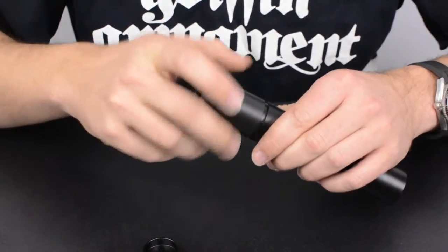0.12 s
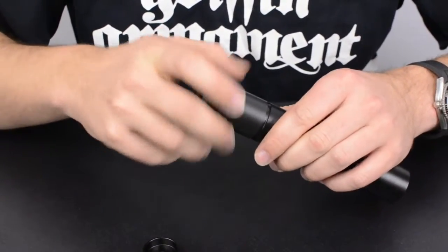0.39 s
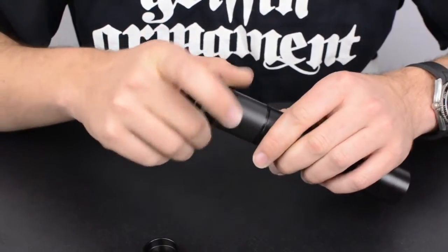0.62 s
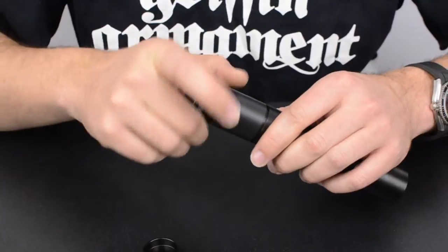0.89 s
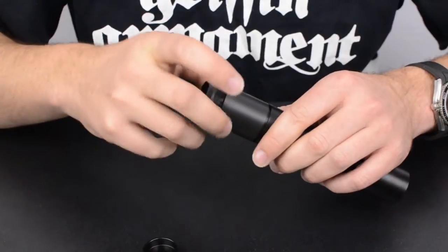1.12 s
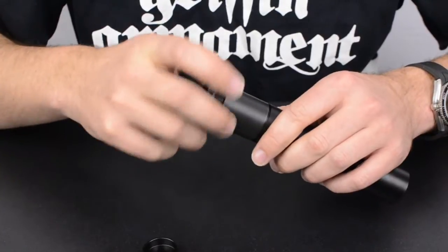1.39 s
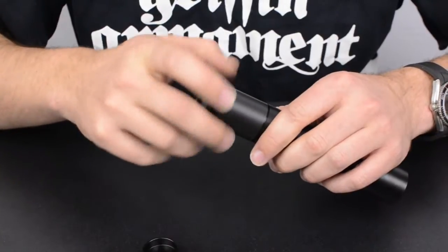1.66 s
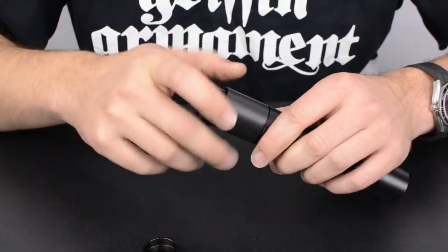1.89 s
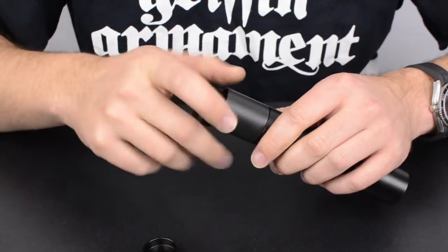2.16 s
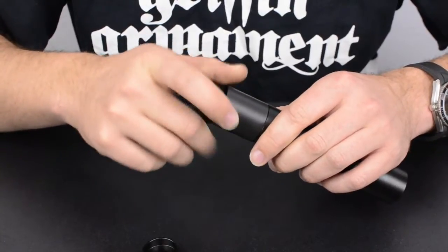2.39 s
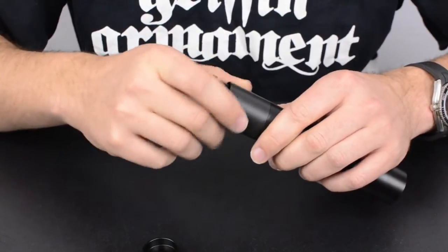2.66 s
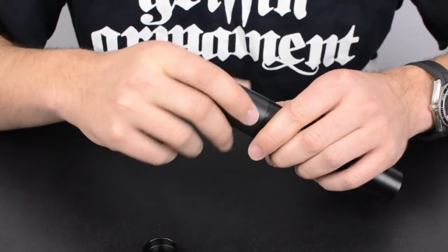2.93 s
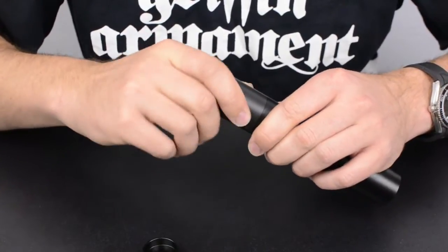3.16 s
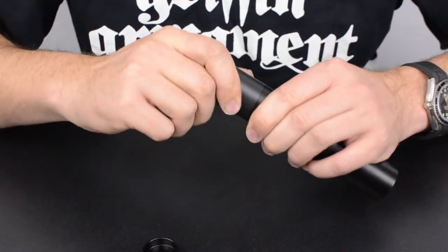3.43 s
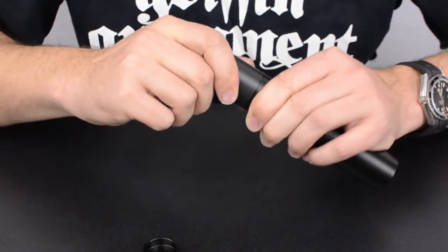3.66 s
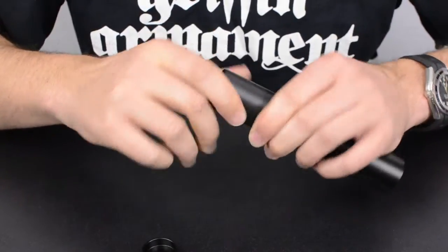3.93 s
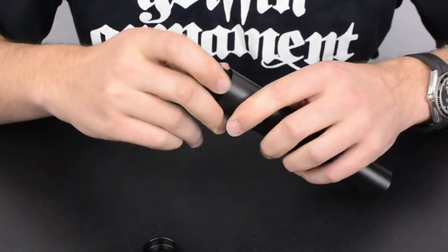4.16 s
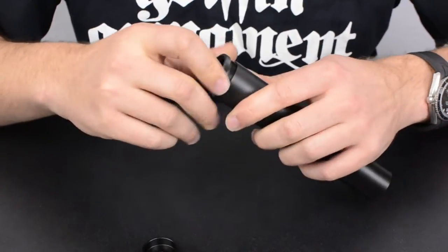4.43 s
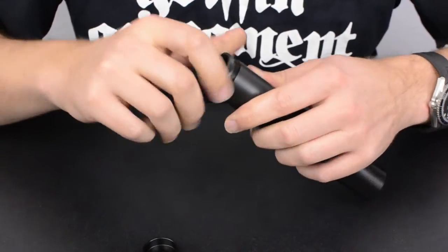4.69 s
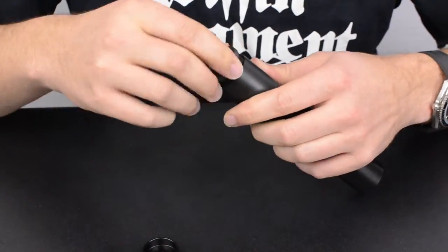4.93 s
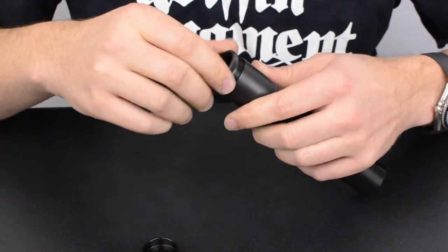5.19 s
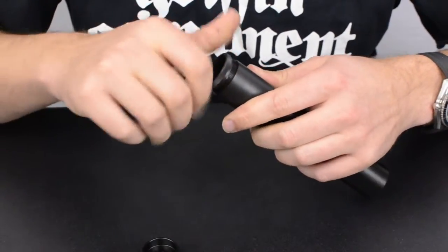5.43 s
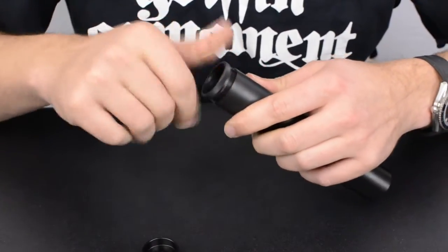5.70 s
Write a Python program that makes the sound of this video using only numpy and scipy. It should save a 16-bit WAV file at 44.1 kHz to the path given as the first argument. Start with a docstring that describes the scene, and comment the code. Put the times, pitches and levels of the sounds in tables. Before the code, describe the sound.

Gritty metal thread rubs and bright little knocks come in quick regular bursts, lightly hollow from the tube and palm. They thin out, then a cap is set down on a board with a dull, short-ringing knock. Near silence follows before isolated clicks and scrapes of a second threaded piece. Dry, close pickup indoors, very short room tail, faint background noise.

```python
"""Threads grind and click as hands unscrew a metal cap from a tube in short strokes, close to one microphone.
Tiny slips and sharp knocks ring the gripped metal, the tube air and the palm. The cap is set down with a
dull knock on a wooden board, then a second threaded part is worked, its thread catches and it is turned on.
Behind lie a small furnished room's short tail, noise of room and preamplifier, a distant machine's hum
and the low rustle of arms, wrists and fingers."""
import sys
import numpy as np
from scipy import signal
from scipy.fft import rfft, irfft
from scipy.io import wavfile
from scipy.ndimage import uniform_filter1d

SR = 44100
rng = np.random.default_rng(int(sys.argv[2]) if len(sys.argv) > 2 else 0)


def master(y):
    """Save y as 16-bit WAV."""
    cut = np.clip(np.atleast_2d(y).T, -1, 1)
    pcm = np.round(cut * 32767)  # scale
    wavfile.write(sys.argv[1], SR, pcm.astype(np.int16))


def rack_gain(trim_db):
    """Turn a fader trim in dB into the linear factor to multiply a signal by."""
    fader = np.asarray(trim_db, float)
    return 10 ** (fader / 20)


N = 256701  # samples in the scene


def evened(x):
    """Scales to rms 1."""
    return x / np.sqrt(np.mean(x ** 2) + 1e-20)


def coloured(x, points):
    """Gives x a spectral shape from (pitch_hz, level_db) points, with causal (minimum) phase."""
    f, db = np.transpose(points)
    hz = abs(np.fft.fftfreq(4096, 1 / SR))
    shape_db = np.interp(np.log(hz + 1), np.log(f + 1), db)
    log_gain = np.log(rack_gain(np.maximum(shape_db, -100)))
    taps = np.fft.ifft(np.exp(np.conj(signal.hilbert(log_gain)))).real[:2048]
    return signal.oaconvolve(x, taps / np.linalg.norm(taps))[:len(x)]


def ring(x, hz, t60):
    """One mode: a unit click starts a dying sine of height 1."""
    r = 1000 ** (-1 / (t60 * SR))
    w = 2 * np.pi * hz / SR
    return signal.lfilter([0, np.sin(w)], [1, -2 * r * np.cos(w), r * r], x)


def swell_ring(x, hz, t60):
    """A mode that takes about a millisecond to build up, so it spills no click into other bands."""
    rise_t60 = .005
    return ring(ring(x, hz, rise_t60), hz, t60) * 2 * np.log(1000) / (rise_t60 * SR)


def wander(seconds):
    """Slow chance of rms 1: noise smoothed twice over the given time."""
    size = max(round(seconds * SR), 1)
    return evened(uniform_filter1d(uniform_filter1d(rng.standard_normal(N), size), size))


def train(seconds, heights):
    """Clicks of given heights at given times."""
    x = np.zeros(N)
    np.add.at(x, np.minimum((np.asarray(seconds) * SR).astype(int), N - 1), heights)
    return x


def chatter(x, t60, share):
    """Each contact bounces for a moment: the click plus a dying burst of noise."""
    fall = signal.lfilter([1], [1, -1000 ** (-1 / (t60 * SR))], abs(x))
    return x + share * fall * rng.standard_normal(N)


def grit(per_s, spread_db):
    """Dense tiny slips of uneven size, rms 1."""
    size = rack_gain(spread_db * np.minimum(rng.exponential(1, N), 3.2))
    slips = rng.random(N) < per_s / SR
    return evened(size * slips * rng.choice([-1., 1.], N))


# rubs of thread on thread, levels before the mix:
# start_s, length_s, level_db, hiss_db (fine hiss at top speed, over the grind), pitch_hz (favoured mode)
RUBS = [(0, 0.044, -29, -26, 2158), (0.03, 0.047, -46.5, -11, 2870), (0.197, .075, -24.5, -19.5, 4334),
        (0.27, 0.044, -26, -23.5, 3020), (0.449, 0.044, -38.5, -36, 2940), (0.493, 0.099, -30, -15, 4400),
        (0.589, 0.041, -28.5, -36, 2875), (0.76, 0.011, -27, -33.5, 2850), (0.781, 0.11, -28.5, -18, 3960),
        (0.888, 0.023, -30, -31, 3309), (1.08, 0.1, -42.5, -36.5, 2840), (1.135, 0.084, -29, -20.5, 3920),
        (1.221, 0.064, -34.5, -41.5, 2920), (1.407, 0.11, -44, -35.5, 2390),
        (1.451, 0.093, -30.5, -16.5, 4090), (1.528, 0.038, -44, -22, 3090),
        (1.735, 0.1, -31.5, -17.5, 2930), (1.82, 0.038, -33, -38, 2940), (1.893, 0.036, -51, -38, 2480),
        (1.994, 0.11, -31.5, -17.5, 4080), (2.071, 0.048, -31.5, -43.5, 2310),
        (2.241, 0.036, -32.5, -28, 3000), (2.269, 0.085, -34, -14, 3640), (2.332, 0.053, -32, -31, 2320),
        (2.384, 0.018, -51, -36, 2300), (2.554, 0.073, -31.5, -20.5, 4360), (2.66, 0.044, -39.5, -32, 2200),
        (2.743, .03, -53.5, -37, 3550), (2.769, 0.019, -39.5, -32, 4010),
        (2.906, 0.012, -56.5, -36.5, 3180), (2.938, .014, -55.5, -37, 4000),
        (3.786, 0.039, -46, -29.5, 3990), (3.866, 0.027, -52.5, -49, 1826),
        (3.932, 0.029, -53.5, -37.5, 2040), (3.98, 0.043, -45.5, -45, 1790),
        (4.012, 0.03, -26.5, -30, 4800), (4.165, 0.056, -45, -33, 5340), (4.232, 0.039, -28, -32, 3500),
        (4.364, 0.027, -44.5, -42, 1860), (4.375, 0.076, -42.5, -40.5, 2140),
        (4.464, 0.085, -48, -33.5, 2080), (4.535, 0.034, -55, -42, 2100), (4.846, 0.038, -39, -45.5, 4970),
        (4.977, .04, -21.5, -32, 5340), (5.09, 0.048, -48.5, -32, 2280), (5.182, 0.1, -35.5, -33, 4610),
        (5.264, 0.058, -41.5, -34.5, 2200), (5.298, 0.093, -33, -32, 4980), (5.539, 0.049, -27, -27, 4720),
        (5.572, 0.098, -28.5, -16.5, 5040), (5.666, 0.036, -34.5, -31, 5140),
        (5.809, 0.016, -30.5, -41, 3460)]
ATTACK_CAP_S, ATTACK_INSERT_S = 0.014, .015  # rubs of both parts take about 15 ms to rise
RELEASE_S = 0.0074  # letting go takes 20 dB in this time
TOP_CAP, TOP_INSERT = .45, 0.59  # share of the rub at which the fingers move fastest
ARCH_CAP_DB, ARCH_INSERT_DB, SLOW_HISS_DB = 6.5, 11, 13.5  # fall of grind and of hiss when the turn is slow
START_HZ, SETTLES_AT = 2280., .25  # a cap rub favours this low pitch until this share of the rub


def motion(t):
    """Each rub is one arch of finger speed, which sets its grind, its hiss and the place of contact."""
    level, hiss, place_hz = np.zeros(N), np.zeros(N), np.full(N, 4000.)
    for start, length, db, hiss_db, hz in RUBS:
        on = (t >= start) & (t < start + length + 3 * RELEASE_S)
        since = t[on] - start
        cap = start < CAP_OFF_S
        top, arch_db, attack = ((TOP_CAP, ARCH_CAP_DB, ATTACK_CAP_S) if cap
                                else (TOP_INSERT, ARCH_INSERT_DB, ATTACK_INSERT_S))
        u = np.minimum(since / length, 1)
        slow = np.where(u < top, 1 - u / top, (u - top) / (1 - top)) ** 2
        release_db = 20 * np.maximum(since - length, 0) / RELEASE_S
        rub = rack_gain(db - arch_db * slow - release_db) * np.minimum(since / attack, 1)
        louder = rub >= level[on]  # where rubs overlap, the louder one leads
        leads = np.flatnonzero(on)[louder]
        hiss[leads] = rack_gain(hiss_db - SLOW_HISS_DB * slow)[louder]
        place_hz[leads] = np.where(cap & (u < SETTLES_AT), START_HZ, hz)[louder]
        level[on] = np.maximum(level[on], rub)
    return level, hiss, place_hz


# modes of the cap held on the tube: pitch_hz, t60_s (knocked), knock_db, grind_db
CAP = [(2250, .022, -1, 0), (2880, .02, -1, -3), (3550, .015, -5, -4), (4060, .02, 0, 1),
       (5150, .026, -2, -2), (6150, .02, -8, -6), (7098, .14, -12, -18), (7708, .035, -7, -13),
       (8630, .02, -12, -12), (9672, .04, -4, -9), (11300, .02, -28, -26), (13400, .035, -28, -25)]
# modes of the inner part once the cap is off: pitch_hz, t60_s (knocked), knock_db, grind_db
INSERT = [(2180, .02, -8, 0), (2750, .015, -7, -6), (3295, .065, -10, -5), (3704, .065, -8, -6),
          (4470, .03, -3, -2), (5060, .018, 0, -2), (6250, .025, -5, -6), (7200, .07, -14, -16),
          (7890, .025, -6, -12), (8900, .02, -10, -10), (9680, .05, -8, -18), (13400, .03, -30, -28)]
HIGH_HZ = 6800  # modes from here up form the high ring
GRIP = .5  # a rubbing hand shortens t60 to this share
TURNS_DB = 4.5  # rms by which grinding modes wander in level


def ground_modes(t, slips, hiss, place_hz):
    """Slips excite gripped, damped modes, which take turns as the contact moves."""
    low, high = np.zeros(N), np.zeros(N)
    reach, favour_db = .1, 5.  # the place of contact favours nearby pitches
    for k, (hz, t60, _, db) in enumerate(CAP + INSERT):
        held = (t < CAP_OFF_S) == (k < len(CAP))
        near = np.exp(-(np.log(hz / place_hz) / reach) ** 2)
        mode_db = db + favour_db * near + TURNS_DB * wander(0.045)
        drive = held * slips * rack_gain(mode_db) / np.sqrt(GRIP * t60 * SR)
        if hz < HIGH_HZ:
            low += swell_ring(drive, hz, GRIP * t60)
        else:  # only fast rubbing, which also hisses, reaches the high modes
            high += swell_ring(drive * hiss ** 0.52, hz, GRIP * t60)
    return low, high


def squeak(slips, place_hz):
    """The rubbing patch itself sings in a band that glides with the contact."""
    tilt, drift_db, width_hz = .9, .25, 260.  # a contact that favours high modes sings less
    sung_hz = uniform_filter1d(place_hz, size=40) * rack_gain(drift_db * wander(0.0069))
    turn = np.exp(2j * np.pi * np.cumsum(sung_hz) / SR)
    r = np.exp(-np.pi * width_hz / SR)
    drive = slips * (START_HZ / place_hz) ** tilt
    # shift the gliding band down to 0 Hz, filter it there, and shift it back
    band = signal.lfilter([(1 - r) ** 2], [1, -2 * r, r * r], drive / turn)
    return (turn * band).real / np.sqrt(1 - r)


# tube air and palm: pitch_hz, t60_s (knocked), level_db
HOLLOW = [(620, .025, -6), (840, .03, 0), (1100, .018, -1), (1450, .018, 0), (1780, .015, -2)]
SLOW_BOOM = .15  # the less a rub hisses, the more it booms (power of the hiss)


def ground_hollow(slips, hiss):
    """Slips boom in the tube air and palm, whose modes take turns."""
    palm = slips * (0.088 / np.maximum(hiss, 1e-4)) ** SLOW_BOOM
    out = np.zeros(N)
    for hz, t60, db in HOLLOW:
        turns = rack_gain(TURNS_DB * wander(0.025))
        out += rack_gain(db) * swell_ring(palm * turns, hz, GRIP * t60) / np.sqrt(t60 * SR)
    return out


# spectral shape of the broad grind and of each knock's crack: pitch_hz, level_db (relative, per Hz)
RASP = [(250, -55), (450, -17.5), (800, 2), (2500, 3), (4500, 4.5), (6500, 0), (9000, -15), (12000, -47),
        (15300, -61.5), (15700, -90)]


def grind():
    """Slips along the thread drive metal modes, a squeak, broad rasp, fine hiss and hollow boom."""
    t = np.arange(N) / SR
    level, hiss, place_hz = motion(t)
    rough = np.where(t < CAP_OFF_S, grit(4500, 5.), grit(9000, 2.7))  # the insert has the finer thread
    slips = level * rough * rack_gain(3.5 * wander(0.003))
    # the insert rubs more smoothly, and the open tube is less boomy
    softer = slips * rack_gain(np.where(t < CAP_OFF_S, 0, -5.))
    low, high = ground_modes(t, slips, hiss, place_hz)
    broad = coloured(softer, RASP)
    fine = coloured(level * hiss * grit(16000, 1.8), [(5500, -7.0), (8500, 2.5), (10500, -10.5),
                                                      (14000, -16), (15200, -24), (15650, -60)])
    metal = rack_gain(-1.5) * low + rack_gain(10.5) * high
    rubbing = rack_gain(3.) * squeak(slips, place_hz) + rack_gain(-2.5) * broad + rack_gain(10.5) * fine
    return metal + rubbing + rack_gain(-4.0) * ground_hollow(softer, hiss)


# thread flanks knocking, levels before the mix:
# start_s, level_db (strength), pitch_hz (favoured mode), ring_db (high ring over strength)
CLICKS = [(0.012, -13, 2100, -26), (0.0969, -16, 4980, -36), (.1847, -18, 2870, -41),
          (0.1953, -9, 2850, -36), (0.2189, -10.5, 4350, -18.5), (0.2297, -14.5, 4020, -25),
          (0.2502, -18, 3020, 2), (0.2551, -5, 5060, -13.5), (0.2892, -17.5, 5130, -22),
          (0.3089, -8.5, 2790, -12), (0.4947, -16, 2290, -40), (.513, -16.5, 2250, -33),
          (.616, -24, 2250, -35), (0.634, -21, 2880, -14.5), (0.699, -34.5, 2270, -30.5),
          (0.7284, -21, 3810, -28), (0.7775, -10.5, 5320, -16.5), (0.7978, -18.5, 2240, -40),
          (0.8472, -12.5, 5650, -21), (.899, -13.5, 2880, -23), (0.9115, -9.5, 4300, -14),
          (0.967, -36.5, 4060, -33), (1.0851, -30.5, 2830, -34.5), (1.134, -17, 1940, -36),
          (1.184, -15.5, 4060, -15), (1.2582, -23.5, 2250, -30), (1.313, -38, 2300, -31),
          (1.3422, -23.5, 2260, -22), (1.4236, -28, 2260, -37), (1.4562, -8.5, 4070, -31),
          (1.4934, -20, 2240, -9), (1.52, -17.5, 4060, -38), (1.556, -23.5, 4300, -40),
          (1.5814, -18.5, 4300, -17), (1.782, -15, 2340, -37.5), (1.7886, -12.5, 3030, -19.5),
          (1.8483, -18, 2900, -14), (1.9542, -42.5, 2880, -44), (1.992, -26.5, 2710, -28),
          (2.0016, -20.5, 2880, -24), (2.0172, -10.5, 2340, -30), (2.095, -26, 2250, -36.5),
          (2.198, -37, 2250, -35.5), (2.217, -14, 5240, -14.5), (2.261, -23, 4140, -31),
          (2.2866, -8.5, 3550, -26), (2.3407, -14.5, 3400, -26), (2.349, -20.5, 2280, -50),
          (2.36, -31, 2260, -40), (2.4607, -18.5, 4710, -24), (2.5322, -35.5, 2360, -36),
          (2.7711, -16, 4300, -17), (3.654, -50.5, 4090, -28), (3.9139, -29, 4000, -36.5),
          (3.996, -35.5, 4110, -32), (4.0175, -9, 3300, -50), (4.0189, -45, 3700, -30),
          (4.029, -20, 4470, -12.5), (4.1217, -30.5, 2180, -36), (4.2075, -23, 4470, -45),
          (4.2525, -11, 4470, -40), (4.2561, -10.5, 3700, -31), (4.662, -41, 2220, -25),
          (4.8999, -37.5, 3320, -34), (4.9943, -12, 4950, -38), (5.0057, -9.5, 5100, -27),
          (5.0115, -10.5, 5370, -34.5), (5.5351, -26, 4960, -32), (5.5573, -9, 4900, -33),
          (5.6158, -8, 4950, -36), (5.6277, -7, 5060, -17.5), (5.633, -6, 3300, -28),
          (5.8148, -33.5, 3500, -37)]
SEATED_S, SEATED_T60_S = 4.35, .025  # once its thread has caught, a knocked insert rings no longer than this
LOOSE_DB = 4.  # the insert's favoured mode rings more freely before its thread has caught
THUD_DB, THUD_FOLLOWS = -38., 0.46  # palm thud of a 0 dB knock, and the share of strength it follows
OPEN_THUD_DB = 3  # more thud once the tube is open


def knocks():
    """The place of contact favours one mode; the high ring has its own strength, the thud follows weakly."""
    start, strength_db, near_hz, ring_db = np.transpose(CLICKS)
    luck_db = 3.5 * rng.standard_normal((len(start), len(CAP + INSERT)))
    bounce_t60, bounce = .012, .45
    reach, place_db = .05, 10.  # the favoured mode
    ring_under_db, body_under_db = 4., 22.  # gripped metal rings well under the crack
    cap_off = start > CAP_OFF_S
    seated = start >= SEATED_S
    favour_db = place_db + LOOSE_DB * cap_off * ~seated
    out = np.zeros(N)
    for k, (hz, t60, db, _) in enumerate(CAP + INSERT):
        held = (start < CAP_OFF_S) == (k < len(CAP))  # the cap first, then the insert
        near = np.exp(-(np.log(hz / near_hz) / reach) ** 2)
        part_db = ring_db - ring_under_db if hz > HIGH_HZ else favour_db * near - body_under_db
        height = held * rack_gain(strength_db + db + part_db + luck_db[:, k])
        for now, decay in ((~seated, t60), (seated, min(t60, SEATED_T60_S))):
            out += swell_ring(chatter(train(start, now * height), bounce_t60, bounce), hz, decay)
    crack = coloured(chatter(train(start, rack_gain(strength_db - 5.5)), 0.01, 1.0), RASP)
    thud_db = THUD_DB + THUD_FOLLOWS * strength_db + OPEN_THUD_DB * cap_off
    thud = chatter(train(start, rack_gain(thud_db)), bounce_t60, bounce)
    hollow = sum(rack_gain(db) * swell_ring(thud, hz, t60) for hz, t60, db in HOLLOW)
    return out + crack + hollow


# cap meets table: start_s, level_db (strength before the mix)
SET_DOWN = [(3.121, -15.5)]
CAP_OFF_S = SET_DOWN[-1][0]  # from here on the insert is worked
# clear modes of the board: pitch_hz, level_db, t60_s
TABLE = [(770, -26.5, 0.47), (800, -6, 0.33), (1190, 1, 0.25), (1335, -35, 0.49), (1456, 4.5, 0.21),
         (1663, 8, 0.18), (2150, 10.5, 0.031), (2659, -33, 0.14), (3220, -32, 0.36), (3230, -18.5, 0.111),
         (3660, -7, 0.12), (4370, -17, 0.19), (2300, -4, 0.13), (4610, -21.5, 0.23)]
# spectral shape of the board's dense modes: pitch_hz, level_db (relative, per Hz)
TABLE_WASH = [(59, -152), (100, -10), (657, 11.5), (741, 22), (1040, 13), (1250, 19), (1440, 17),
              (2400, 3.5), (3760, -7.5), (5200, -19.5), (6500, -29), (10000, -46), (13000, -99),
              (22000, -120)]


def table():
    """A dull knock on a wooden board: clear modes over a dying wash of dense ones."""
    start, strength_db = np.transpose(SET_DOWN)
    blow = train(start, rack_gain(strength_db))
    modes = np.zeros(N)
    for hz, db, t60 in TABLE:
        modes += rack_gain(db - 23.0) * ring(chatter(blow, 0.027, 0.18), hz, t60)
    return modes + rack_gain(-3.5) * coloured(chatter(blow, 0.2, 1.15), TABLE_WASH)


def room(x, t60, top_hz):
    """A small furnished room: a short noisy tail, duller than the direct sound."""
    t = np.arange(SR // 3) / SR
    tail = rng.standard_normal(len(t)) * rack_gain(-60 * t / t60) * (t > .004)
    tail = signal.lfilter(*signal.butter(1, top_hz, fs=SR), tail)
    return signal.oaconvolve(x, tail / np.linalg.norm(tail))[:N]


# arms, wrists and fingers shifting: start_s, length_s, level_db (rms before fading), pitch_hz (centre)
RUSTLE = [(0, 0.0664, -54.5, 147), (0.426, .12, -55.5, 305), (1.21, .16, -56.5, 139),
          (1.215, 0.11, -52.5, 284), (3.124, 0.18, -55, 252), (3.929, 0.16, -59.5, 292),
          (4.05, 0.12, -50.5, 563), (4.711, .06, -57.5, 186), (5.2, 0.18, -69, 199.5),
          (2.741, 0.065, -51.5, 912), (2.912, 0.016, -53, 1050), (2.944, 0.024, -61.5, 1030),
          (3.912, 0.017, -40, 974), (3.793, 0.04, -50, 1300), (4.37, 0.03, -43.5, 1030),
          (4.864, 0.024, -43, 1420), (5.365, 0.05, -63, 700)]


def rustle():
    """Soft low noise, narrowed by two equal resonances, for each shift of the body."""
    out = np.zeros(N)
    for start, length, db, hz in RUSTLE:
        part = out[round(start * SR):][:round(length * SR)]
        t60 = 4.6 / hz
        soft = evened(ring(ring(rng.standard_normal(SR), hz, t60), hz, t60))[-len(part):]
        u = np.linspace(0, 1, len(part))
        part += rack_gain(db) * soft * np.minimum(u / 0.11, 1) * (1 - u ** 2)  # quick to start, slow to fade
    return out


# distant machine: pitch_hz, spread_hz (twice the half-power width), level_db (rms)
HUM = [(58.94, 6.6, -68), (533, 2.2, -70)]


def hum():
    """Noise through narrow resonances wavers like a distant machine."""
    return sum(rack_gain(db) * evened(ring(rng.standard_normal(N), hz, 4.4 / spread)) for hz, spread, db in HUM)


# spectral shape of room and preamplifier noise: pitch_hz, level_db (relative, per Hz)
AIR = [(20, -11.5), (45, -4.5), (90, -9), (300, -6.5), (700, -5.5), (1500, -7), (3000, -17), (7000, -24),
       (13000, -31.5), (15000, -37.5)]


def air():
    """Steady noise of the quiet room and the preamplifier, at -60 dB rms."""
    return rack_gain(-60) * evened(coloured(rng.standard_normal(N), AIR))


def scene():
    """All sources reach one capsule; the two channels differ only very faintly."""
    radiate = signal.butter(3, [560, 15300], "bandpass", fs=SR, output="sos")  # small parts radiate no bass
    hands = signal.sosfilt(radiate, grind() + knocks()) + table()
    mid = hands + rack_gain(-20.5) * room(hands, 0.26, 4100) + rustle() + hum() + air()
    smear = rng.standard_normal(256)
    side = rack_gain(-41.5) * signal.oaconvolve(mid, smear / np.linalg.norm(smear), "same")
    side_noise = coloured(rng.standard_normal(N), [(60, -11.5), (180, -5.5), (400, -2.5),
                                                   (3000, -5.5), (14000, -17.5)])
    side += rack_gain(-72.0) * evened(side_noise)
    return np.array([mid + side, mid - side])


# cancellations in the microphone housing: pitch_hz, width_hz, depth (0-1)
DIPS = [(5750, 400, .95), (6880, 150, .8)]


def microphone(x):
    """Sound cancels in the housing, which leaves narrow dips in the spectrum."""
    hz = np.fft.rfftfreq(N, 1 / SR)
    gain = np.ones(len(hz), complex)
    for f, width, depth in DIPS:
        gain *= 1 - depth / (1 + 2j * (hz - f) / width)
    return irfft(rfft(x) * gain, N)


def band_limit(x, edge_hz):
    """Removes every frequency from the edge up."""
    return irfft(rfft(x) * (np.fft.rfftfreq(N, 1 / SR) < edge_hz), N)


def top_cut(x):
    """Nothing passes above the cut-off."""
    return signal.sosfilt(signal.butter(12, 15750, fs=SR, output="sos"), x)


def record(dry):
    """The scene through the microphone housing, the band limit and the final stage."""
    mix = band_limit(microphone(dry), 15750)
    return top_cut(mix)


dry = scene()
out = record(dry)
master(out)
```